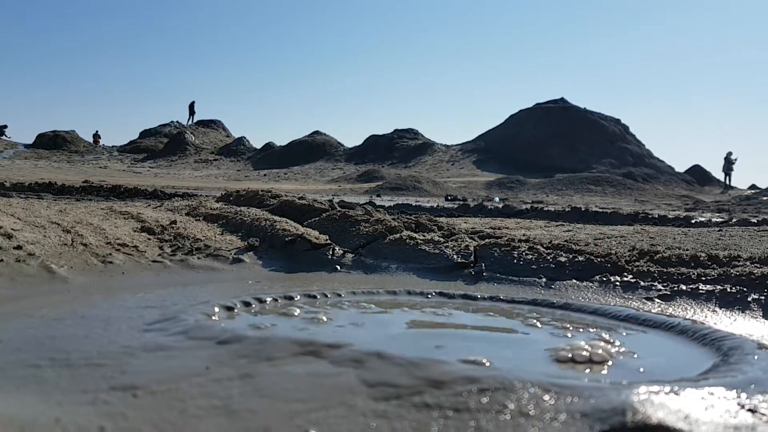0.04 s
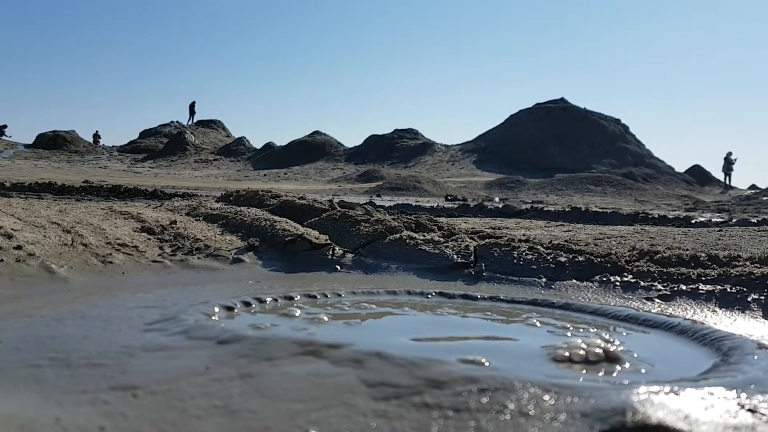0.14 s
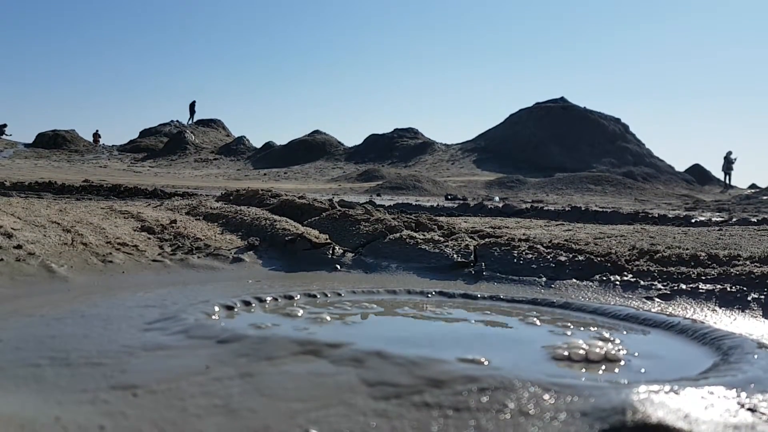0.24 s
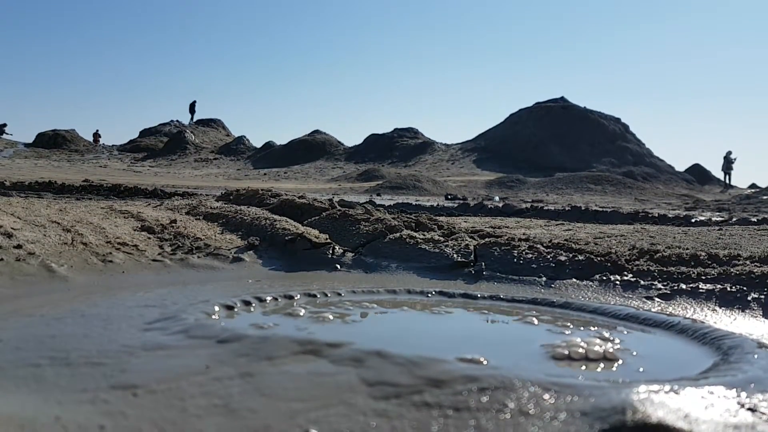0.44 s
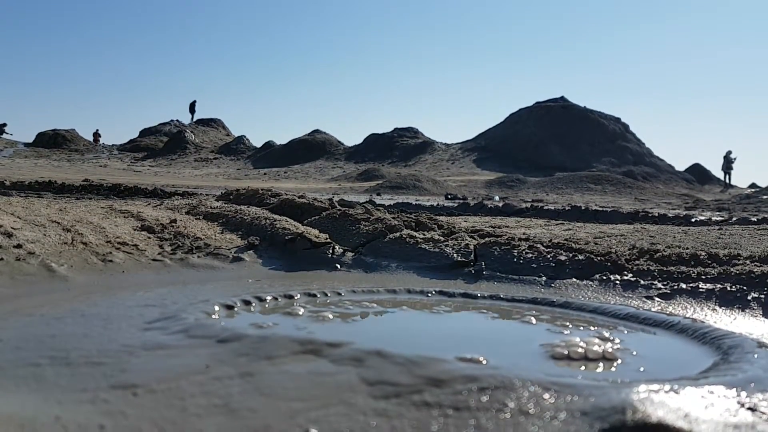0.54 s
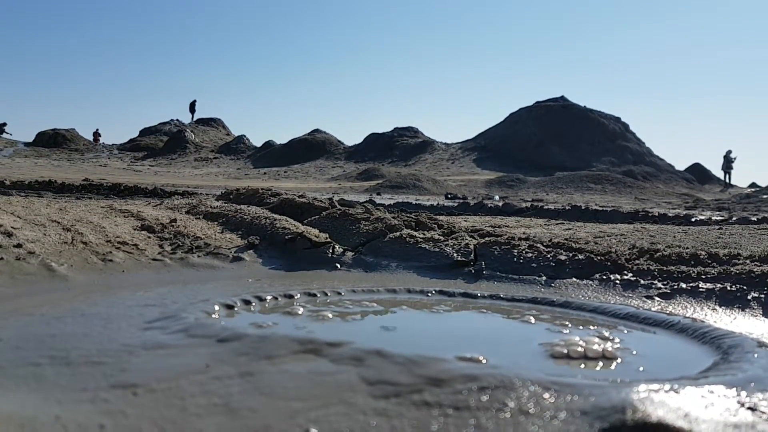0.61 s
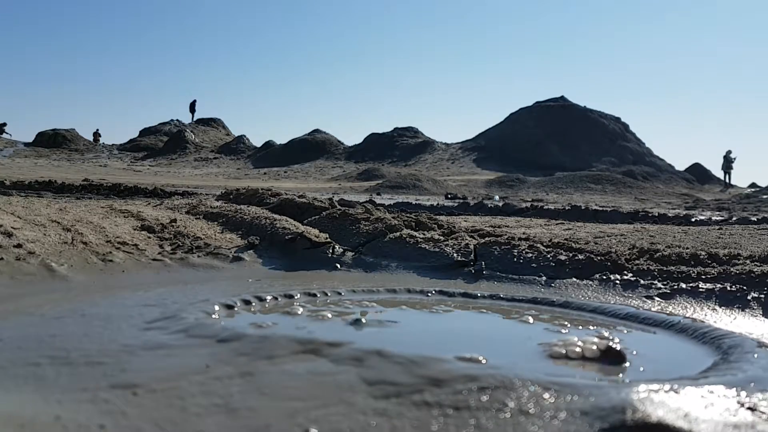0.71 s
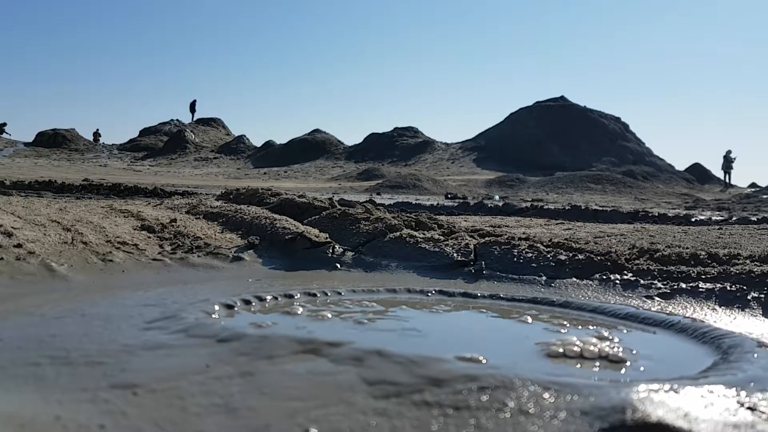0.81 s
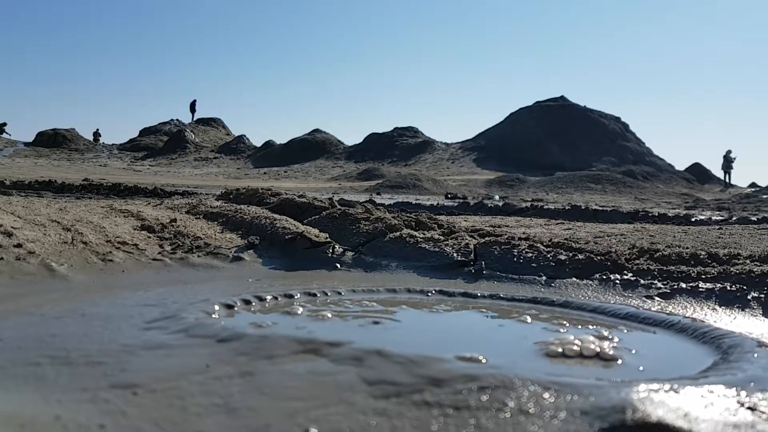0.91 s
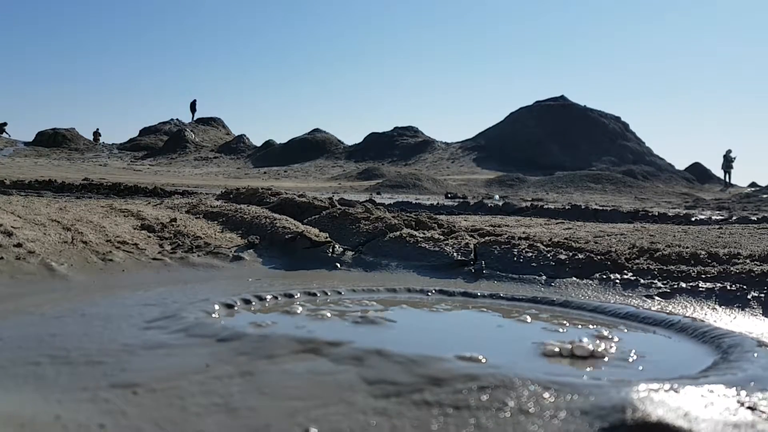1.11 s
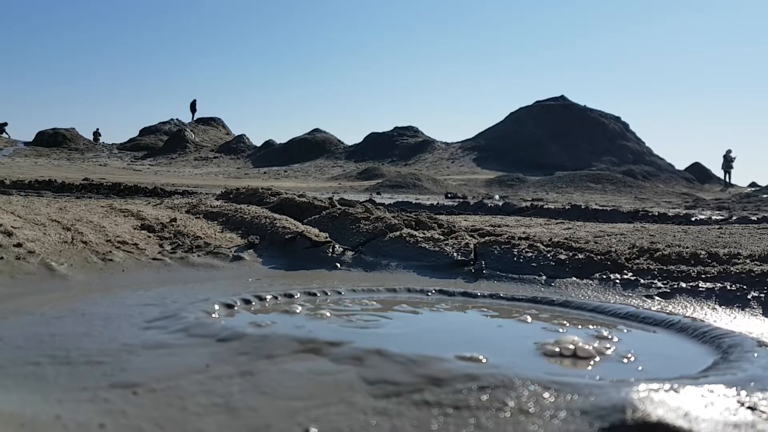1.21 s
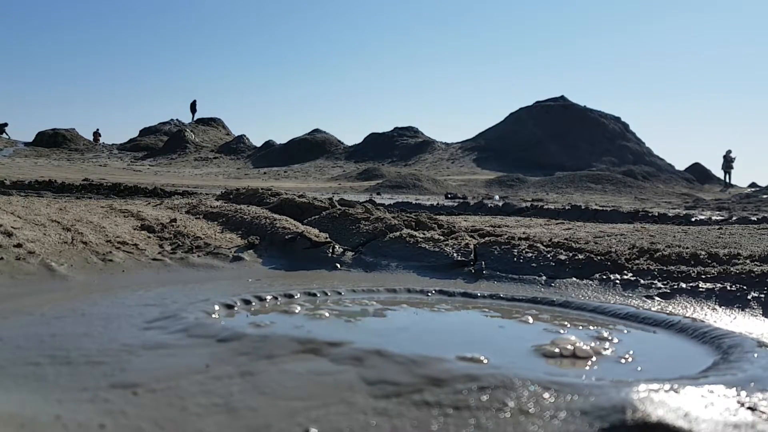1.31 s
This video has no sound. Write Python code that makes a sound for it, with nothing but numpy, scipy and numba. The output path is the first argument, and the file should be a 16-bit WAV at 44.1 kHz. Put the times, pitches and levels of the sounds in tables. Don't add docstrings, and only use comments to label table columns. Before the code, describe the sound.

Wind noise dominates: near quiet at first, then dull thumps crowd into a sharp, choppy gust and die away. Thin mud-film snaps and a small rising bubble blip sit close by on open ground, above soft microphone hiss.

```python
import sys
import numpy as np
from scipy import signal
from scipy.fft import rfft, irfft
from scipy.io import wavfile
from numba import njit

SR = 44100
rng = np.random.default_rng(int(sys.argv[2]) if len(sys.argv) > 2 else 0)


def store_pcm(level_fs):
    pcm = np.round(np.clip(level_fs, -1, 1) * 32767).astype(np.int16)
    wavfile.write(sys.argv[1], SR, np.atleast_2d(pcm).T)


def volts(x):
    e = np.asarray(x, float) / 20
    return 10 ** e


N = 59535


@njit
def add(out, start, hz, cycles, size, phase, sr):
    for k in range(len(start)):
        width = cycles[k] / hz[k] * sr / 4
        centre = start[k] * sr
        first = max(int(centre - 4 * width), 0)
        last = min(int(centre + 4 * width) + 1, len(out))
        for i in range(first, last):
            u = i - centre
            bell = np.exp(-.5 * (u / width) ** 2)
            out[i] -= size[k] * bell * np.cos(2 * np.pi * hz[k] * u / sr + phase[k])
    return out


def packets(t, hz, cycles, size, phase):
    columns = np.broadcast_arrays(t, hz, cycles, size, phase)
    return add(np.zeros(N), *(1. * column for column in columns), 1. * SR)


def pan(x, db):
    return x * volts(np.array([[db / 2], [-db / 2]]))


def walk(rate_hz):
    x = signal.sosfilt(signal.butter(2, rate_hz, fs=SR, output="sos"), rng.standard_normal(N))
    return x / x.std()


def high_pass(x, order, hz):
    return signal.sosfilt(signal.butter(order, hz, "high", fs=SR, output="sos"), x)


# f/Hz, level/dB (per Hz)
HISS_COLOUR = [(400, 0), (900, -2.5), (2400, -8), (6000, -17), (9500, -20), (13000, -16.5), (15700, -13.5),
               (16000, -43)]


def hiss():
    f = np.arange(N // 2 + 1) * SR / N + 1
    hz, db = np.array(HISS_COLOUR).T
    shape = volts(np.interp(np.log(f), np.log(hz), db))
    noise = irfft(rfft(rng.standard_normal((2, N))) * shape, N)
    level_db = -73 + 3.5
    return noise * volts(level_db) / np.sqrt(np.mean(shape[f > 900] ** 2))


# t/s, level/dB, eddy speed (1 = light air)
LEFT_WIND = [(0, -66, 0.79), (.06, -51, 0.71), (.165, -57, 1.05), (.225, -47.5, 1.15), (.33, -45, 1.22),
             (.385, -36.5, 2.22), (.45, -42.5, 2.34), (.495, -41.5, 2.5), (.545, -33, 1.67),
             (.625, -33.5, 2.36), (.69, -43, 1.9), (.735, -37, 2.15), (.835, -35.5, 1.88),
             (.895, -44, 1.46), (.97, -44.5, 1.5), (1.077, -32, 1.29), (1.106, -51, 1.08),
             (1.35, -52.5, 1.22)]
# t/s, level/dB, eddy speed (1 = light air)
RIGHT_WIND = [(0, -55.5, 1.38), (.07, -51.5, 0.84), (.15, -52, 0.95), (.21, -47, 0.67), (.3, -48.5, 0.98),
              (.4, -44, 0.61), (.45, -43, 1.13), (.52, -36.5, 0.9), (.6, -38, 1.16), (.64, -43, 0.8),
              (.67, -40, 0.66), (.75, -46.5, 0.76), (.82, -48.5, 0.85), (.88, -42, 0.6), (.95, -47, 0.75),
              (1.04, -49, 1), (1.12, -45.5, 1.01), (1.35, -50, 0.94)]
# f/Hz in light air, spread/octaves, length/cycles, level/dB, extra level/dB per doubled speed
EDDIES = [
    (57.43, 0.15, 2.73, -3.5, -8),
    (85.45, 0.29, 1.55, -2.5, -8),
    (145.1, 0.27, 1.58, -5.5, 3),
    (284.74, 0.26, 1.805, -7.5, 6),
    (444.5, 0.12, 2.86, -29.5, 10.5),
]


def buffet(wind, shelter_db):
    at, wind_db, speed = np.array(wind).T
    eddies_per_cycle, stretch_hz = .9, 486
    flicker_db, scatter_db = 2.4, 2.5
    flicker = walk(61)
    out = np.zeros(N)
    for hz, spread, cycles, own_db, speed_db in EDDIES:
        u, g = rng.random((1200, 2)).T, rng.standard_normal((1200, 2)).T
        t = np.cumsum((.3 + 1.4 * u[0]) / (hz * eddies_per_cycle))
        t = t[t < N / SR]
        n = len(t)
        v = np.clip(np.interp(t, at, speed), .5, 4)
        level_db = np.interp(t, at, wind_db) + own_db + speed_db * np.log2(v)
        level_db += flicker_db * v * flicker[(t * SR).astype(int)] + scatter_db * g[0, :n]
        pitch = hz * v ** ((hz / stretch_hz) ** 2) * 2 ** (spread * g[1, :n])
        ceiling_db = -32 + shelter_db + 2.5 * np.log2(hz / stretch_hz)
        size = 1 / (volts(-level_db - 6) + volts(-ceiling_db))
        phase = 1.12 * np.pi * (u[1, :n] - .5)
        out += packets(t, pitch, cycles, size, phase)
    return out


def ring(u, hz, t60):
    return (u > 0) * np.exp(-np.log(1000) * np.abs(u) / t60) * np.sin(2 * np.pi * hz * u)


# t/s, peak level/dB, body level/dB (re peak), left-right/dB
TICKS = [
    (.0524, -61, 0, 4),
    (.4726, -49, -8, 1),
    (.5584, -54, -3, -3),
    (.7984, -46.5, -24, 0),
    (.9278, -45.5, -23, 1),
    (1.0006, -36.5, -18, 1),
    (1.086, -44.5, -23, -2),
    (1.1184, -66, 8, 0),
    (1.3204, -51, -2, -6),
]


def film_snaps():
    out, t = np.zeros((2, N)), np.arange(N) / SR
    port_lag = np.array([[0], [.000014]])  # s, right port later
    for at, db, body_db, side_db in TICKS:
        u = t - at - port_lag
        snap = ring(u, 14460, 0.0014) - volts(body_db) * ring(u, 8000, 0.0013)
        out += pan(volts(db) * snap, side_db)
    return out


# t/s, peak level/dB,
# f/Hz
LEFT_SLAPS = [(0.3559, -31.5, 229), (0.3625, -31.5, 178), (0.3738, -32, 54.5), (0.3773, -29, 207),
              (0.3907, -32, 317), (0.408, -27.5, 199), (0.419, -30.5, 77), (0.4279, -39, 125),
              (0.4548, -27, 141), (0.4633, -25.0, 352), (0.4724, -26.5, 357), (0.4746, -28.5, 124),
              (0.4861, -26.5, 158), (0.4899, -23.5, 360), (0.4914, -22, 116), (0.4941, -25, 300),
              (0.499, -28.5, 290), (0.502, -25, 336), (0.5133, -31.5, 89), (0.5215, -26, 226),
              (0.5242, -22.5, 263), (0.5346, -23, 204), (0.5369, -25, 328), (0.5434, -40, 69.4),
              (0.5444, -25.5, 178), (0.5534, -27.5, 226), (0.5632, -31.5, 99), (0.5697, -30, 204),
              (0.5938, -49, 111), (0.6094, -27, 347), (0.6148, -28, 146), (0.6162, -26.5, 353),
              (0.6208, -39, 126), (0.6526, -31.5, 162), (0.6564, -27.5, 277), (0.6711, -33, 207),
              (0.6966, -32.5, 88), (0.7082, -35, 141), (0.7138, -26.5, 352), (0.7276, -28.5, 156),
              (0.733, -32, 55), (0.7414, -24, 180), (0.7457, -27.5, 78), (0.7554, -32.5, 88),
              (0.7601, -24.5, 290), (0.7769, -36, 77.5), (0.7837, -29.5, 250), (0.7909, -33.5, 160),
              (0.8, -30.5, 206), (0.8185, -29, 61), (0.8314, -31.5, 56), (0.834, -30.5, 199),
              (0.9979, -28.5, 286), (1.0191, -33, 110), (1.0244, -24.5, 275), (1.0361, -39, 88),
              (1.049, -34.5, 100), (1.0591, -31.5, 123), (1.0721, -27, 260), (1.0745, -31.5, 78),
              (0.0613, -37, 140),
    (0.102, -40.5, 70),
    (0.3055, -39, 55),
    (0.3418, -36, 55),
    (0.866, -35.5, 141),
    (0.8916, -34, 78.4),
    (0.9613, -32.5, 268),
    (1.1726, -38, 55),
    (1.2848, -39, 101),
]
# t/s, peak level/dB, f/Hz
RIGHT_SLAPS = [(0.2074, -36, 71), (0.2266, -41, 111), (0.288, -38, 86), (0.3363, -37, 55), (0.391, -42, 54),
               (0.421, -42, 69), (0.4464, -32, 254), (0.4518, -31, 108), (0.4687, -36.5, 226),
               (0.47, -32, 111), (0.4737, -46, 61), (0.4782, -36.5, 225), (0.481, -38, 78),
               (0.4923, -40, 90), (0.5022, -26, 111), (0.5058, -32, 158), (0.512, -29, 55),
               (0.518, -44, 125), (0.5203, -28, 370), (0.5211, -25, 228), (0.5228, -28, 141),
               (0.5408, -28, 156), (0.547, -41, 78), (0.565, -32, 159), (0.5774, -31.5, 99),
               (0.5857, -29, 204), (0.5885, -38, 55), (0.6093, -38, 55.4), (0.618, -37.5, 99),
               (0.6407, -35, 99), (0.6601, -30.5, 226), (0.6626, -32, 87.5), (0.6646, -47, 61),
               (0.6903, -44, 88), (0.705, -37.5, 54), (0.715, -35, 111), (0.7197, -31, 284),
               (0.7237, -34, 55.4), (0.741, -36.5, 98.5), (0.7651, -33, 140), (0.789, -38, 55),
               (0.825, -38, 55), (0.8553, -37.5, 55.6), (0.8652, -33, 178), (0.8876, -38.5, 88),
               (0.943, -38, 69), (0.9634, -35, 125), (0.9878, -36, 98), (1.004, -36, 141),
               (1.0114, -34, 54), (1.0178, -27, 375), (1.022, -28.5, 204), (1.0382, -43, 124),
               (1.048, -33.5, 87), (1.0756, -33.5, 54.6), (1.0902, -40, 159), (1.119, -40.5, 68.5),
               (1.1667, -39.0, 54.6), (1.2568, -37.5, 70), (1.3077, -42.5, 86.4)]


def slaps():
    out = []
    for rows in (np.array(LEFT_SLAPS), np.array(RIGHT_SLAPS)):
        t, db, hz = rows.T
        out.append(packets(t, hz, 1.57, volts(db), 0))
    return np.array(out)


# t/s, length/s, start f/Hz, end f/Hz, level/dB
BUBBLES = [
    (1.310, .026, 580, 760, -56),
    (.205, .06, 1305, 1295, -75),
    (.29, .11, 1320, 1300, -78),
]


def bubbles():
    out, t = np.zeros(N), np.arange(N) / SR
    for at, length, start_hz, end_hz, db in BUBBLES:
        u = np.clip((t - at) / length, 0, 1)
        swell = np.sqrt(np.abs(np.sin(np.pi * np.sqrt(u))))
        turns = length * (start_hz * u + (end_hz - start_hz) * u ** 2 / 2)
        out += volts(db - 2) * swell * np.sin(2 * np.pi * turns)
    return out


# t/s, peak level/dB, f/Hz
LEFT_SWIRLS = [(.362, -48, 670), (0.3928, -39.5, 940), (0.4333, -38.5, 1160), (0.4637, -35, 1110),
               (0.4716, -34.5, 1290), (.4774, -47, 1500), (0.483, -43, 1610), (0.4867, -30.5, 1940),
               (.4887, -50.5, 2780), (0.4911, -39, 2020), (0.4978, -36.5, 1940), (.501, -43.5, 2340),
               (.5118, -51, 2030), (0.5485, -35.5, 1050), (0.561, -37, 1020), (.567, -42, 1170),
               (0.6087, -42, 1000), (0.6174, -45, 1050), (.6285, -44, 1010), (0.6542, -37, 950),
               (.7104, -40, 865), (0.7435, -41.5, 990), (.7695, -37.5, 1110), (.806, -35, 830),
               (0.8183, -47, 990), (0.861, -35, 716), (.9292, -37.5, 600), (.9617, -38, 626),
               (1.0185, -48, 755), (1.0565, -34.5, 594), (.247, -44, 480), (.273, -50, 470),
               (.298, -43.5, 480), (.335, -58, 504), (.421, -39.5, 710), (.4535, -52, 895),
               (.4905, -33, 900), (.4885, -39, 1290), (.4995, -41, 1240), (.5005, -56, 3150),
               (.509, -49, 1860), (.5145, -55, 2170), (.544, -48, 1050), (.5655, -47, 1400),
               (.65, -47, 1310), (.841, -48, 824), (.897, -51, 700), (1.0755, -45.5, 570)]
# t/s, peak level/dB, f/Hz
RIGHT_SWIRLS = [
    (.5205, -38.5, 630),
    (1.0175, -43, 790),
    (1.001, -45, 450),
    (.84, -50, 580),
]


def swirls():
    out = []
    for rows in (LEFT_SWIRLS, RIGHT_SWIRLS):
        t, db, hz = np.array(rows).T
        cycles = 3.05 * np.sqrt(hz / 972)
        out.append(packets(t, hz, cycles, volts(db), rng.random(len(t)) * 2 * np.pi))
    return np.array(out)


# t/s, peak level/dB, width/s, sign, left-right/dB
POPS = [
    (0.7232, -29.5, 0.000089, 1, 4),
    (1.185, -43.5, 0.00043, -1, -4),
    (1.19, -48.5, 0.00018, -1, -14),
]


def pops():
    out, t = np.zeros((2, N)), np.arange(N) / SR
    for at, db, width, sign, side_db in POPS:
        side_width = np.where(t > at, width, 0.16 * width)
        pulse = np.exp(-np.abs(t - at) / side_width)
        out += pan(np.sign(sign) * volts(db) * pulse, side_db)
    return high_pass(out, 2, 500)


def scene():
    wind = np.array([buffet(LEFT_WIND, 0), buffet(RIGHT_WIND, -7)]) + slaps() + swirls()
    mud = film_snaps() + bubbles() + pops()
    return hiss() + wind + mud


def low_pass(x):
    return signal.sosfilt(signal.butter(12, 16800, fs=SR, output="sos"), x)


def record(dry):
    x = high_pass(dry, 3, 47.7)
    x = signal.sosfilt(signal.ellip(8, .2, 60, 16700, fs=SR, output="sos"), x)
    return low_pass(x)


dry = scene()
out = record(dry)
store_pcm(out)
```